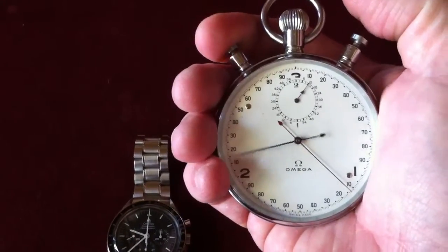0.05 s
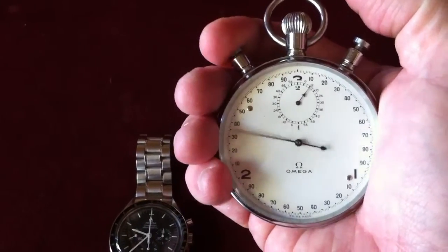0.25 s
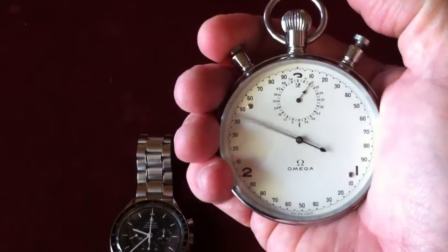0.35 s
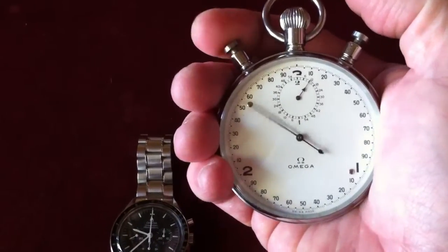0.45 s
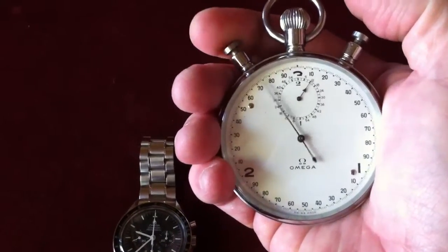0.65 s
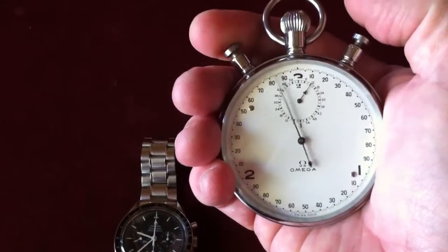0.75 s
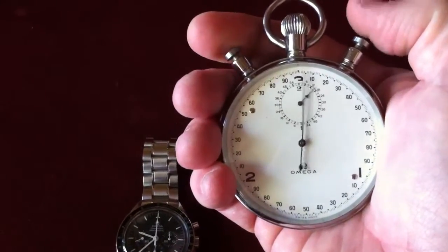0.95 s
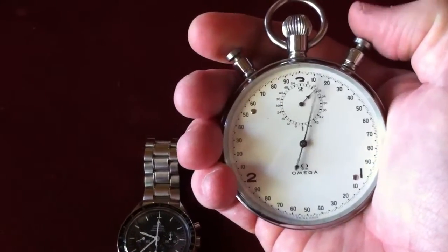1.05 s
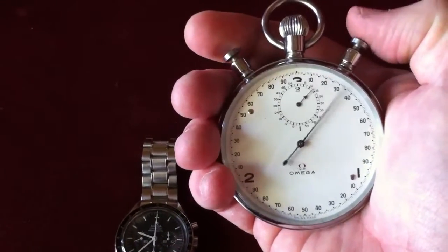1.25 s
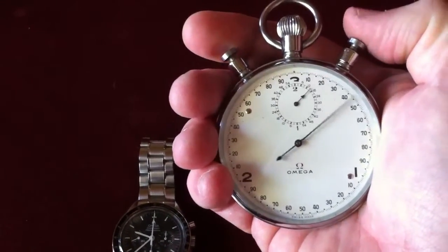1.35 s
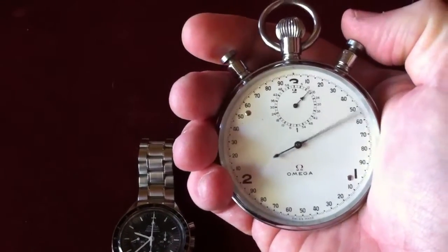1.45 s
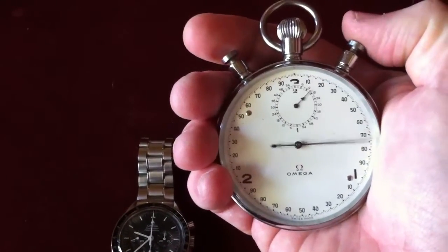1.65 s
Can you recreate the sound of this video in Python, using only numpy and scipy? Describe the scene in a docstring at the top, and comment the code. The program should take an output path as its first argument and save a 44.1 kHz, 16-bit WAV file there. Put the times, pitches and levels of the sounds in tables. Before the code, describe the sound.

A stopwatch button snaps once, sharp and metallic, near the start, after a tiny gap of silence. A very faint, rapid ticking whir runs throughout over low room hiss, heard close up in a quiet room.

```python
"""A stopwatch in the hand

A mechanical stopwatch runs close by in a quiet room. Its escapement whirs at about a hundred
beats a second: noise impulses excite damped modes of the steel case. All sound cuts out for
an instant, then the pusher snaps once: two filtered impulses, a brief ring and a rattle.
A diffuse room tail, shaped noise and a faint sine whine complete the sound field."""
import sys
import numpy as np
from scipy import signal
from scipy.fft import rfft, irfft
from scipy.io import wavfile
from scipy.ndimage import uniform_filter1d

SR = 44100
rng = np.random.default_rng(int(sys.argv[2]) if len(sys.argv) > 2 else 0)


def generate_wav(signal):
    """Clip the signal to [-1, 1] and save it as 16-bit WAV at the path in sys.argv[1]."""
    frames = np.transpose(np.atleast_2d(signal))
    scaled = np.clip(frames, -1, 1) * 32767
    pcm = np.round(scaled).astype(np.int16)
    wavfile.write(sys.argv[1], SR, pcm)


N = 74970  # length in samples


def amp(db):
    """Logarithmic level: converts decibels to an amplitude factor."""
    return 10 ** (np.asarray(db) / 20)


def unit(x):
    """Normalization: scales a signal to rms 1."""
    return x / np.sqrt(np.mean(x ** 2) + 1e-20)


def read(points, hz):
    """Interpolation: reads a table on a logarithmic frequency axis."""
    f, value = np.transpose(points)
    return np.interp(np.log(hz + 1), np.log(f + 1), value)


def add(mix, s, sound):
    """Superposition: adds a sound to the mix in place, from time s or from 0 if s is negative."""
    part = mix[max(round(s * SR), 0):][:len(sound)]
    part += sound[:len(part)]


def colour(x, points, size=4096):
    """Minimum-phase filtering: a causal response to the given spectrum keeps attacks sharp."""
    hz = abs(np.fft.fftfreq(size, 1 / SR))
    log_gain = np.log(amp(read(points, hz)))
    # the Hilbert transform of the log gain supplies the minimum phase
    response = np.exp(np.conj(signal.hilbert(log_gain)))
    taps = np.fft.ifft(response).real
    return signal.fftconvolve(x, taps[:size // 2])[:N]


GRAIN_DB = 4.5  # random level spread from sample to sample


def burst(t60, size=2048):
    """Exponential decay: a dying puff of uneven micro-impacts, normalized to energy 1."""
    push, grain = rng.standard_normal((2, size))
    decay_db = -60 * np.arange(size) / SR / t60
    x = push * amp(GRAIN_DB * grain + decay_db)
    return x / np.linalg.norm(x)


def ring(hz, db, t60):
    """Modal superposition: one blow starts a sum of exponentially damped sines."""
    t = np.arange(SR // 4)[:, None] / SR
    modes = amp(db - 60 * t / t60) * np.sin(2 * np.pi * hz * t)
    return modes.sum(axis=1)


# blows of the pusher's lever (t/s, relative level/dB)
LEVER_BLOWS = [(0.24888, 0), (0.24922, -12)]
# spectrum of the snap (f/Hz, gain/dB)
SNAP_SPECTRUM = [(100, -33.5), (400, -5.5), (720, 3), (1100, 3.5), (1500, -5), (2400, -28.5), (3100, 1),
                 (4500, -8.5), (5200, -11), (6400, 0.5), (7400, 8.5), (8500, -4), (9100, -21), (9900, 3),
                 (11000, -14), (12000, -12), (12600, -5), (13600, 3), (15500, -16)]
# modes of the steel case, also excited by the escapement
# (f/Hz, relative level under pusher/dB, t60/s, relative level under escapement/dB)
CASE_MODES = [(1279, -51, 0.057, -92), (1637, -21.5, 0.0097, -121), (1747, -49, 0.067, -69.5),
              (1978, -43, 0.048, -75), (2610, -57, 0.027, -84), (3240, -39, 0.0063, -100),
              (3288, -42, 0.022, -63.5), (5730, -33, 0.022, -76.5), (6230, -34.5, 0.035, -77),
              (6650, -40, 0.022, -88), (7350, -64, 0.022, -78.5), (7966, -41.5, 0.06, -78),
              (8420, -49, 0.043, -69), (10920, -43, 0.045, -78.5), (11250, -30.5, 0.012, -64),
              (13730, -34.5, .026, -85)]
# spectrum of the loose works (f/Hz, gain/dB)
RATTLE_SPECTRUM = [(300, -3.5), (700, -19), (1300, 1.5), (2300, -4.5), (3100, 7), (5000, -2.5), (7000, 4.5),
                   (9300, -6.5), (11000, 6.5), (12200, -19), (13800, 2), (15500, -14)]
# soft nudge of the case in the hand (t/s, level before filtering/dB, t60/s, low-pass corner f/Hz)
SOFT_NUDGE = (0.51, -33.5, .06, 3000)
SNAP_DB, RING_DB = 0.5, 0.5  # offsets to the table levels
RING_LAG_S = 0.00059
RATTLE_DB, RATTLE_T60_S = -9, 0.019  # level before filtering
BASS_CUT_HZ = 330


def pusher():
    """Impulsive excitation: lever blows ring the case and rattle the works; a soft nudge follows."""
    force, case, rattle = np.zeros((3, N))
    for s, db in LEVER_BLOWS:
        add(force, s, amp([SNAP_DB + db]))  # a single-sample impulse
    start = LEVER_BLOWS[0][0]
    mode_hz, mode_db, mode_t60, _ = np.transpose(CASE_MODES)
    add(case, start + RING_LAG_S, ring(mode_hz, mode_db + RING_DB, mode_t60))
    add(rattle, start, amp(RATTLE_DB) * burst(RATTLE_T60_S))

    s, db, t60, top_hz = SOFT_NUDGE
    low_pass = signal.butter(1, top_hz, fs=SR)
    add(rattle, s, signal.lfilter(*low_pass, amp(db) * burst(t60)))

    click = colour(force, SNAP_SPECTRUM) + case + colour(rattle, RATTLE_SPECTRUM)
    high_pass = signal.butter(2, BASS_CUT_HZ, "high", fs=SR)
    return signal.lfilter(*high_pass, click)


# contacts in one beat: unlocking, impulse, drop, two bounces (t after beat/s, relative level/dB)
BEAT_CONTACTS = [(-.0017, -5), (.0002, 4), (.0012, -2.5), (.003, -12), (.0044, -6.5)]
# spectrum of the ticking (f/Hz, relative gain/dB)
TICK_SPECTRUM = [(500, -68), (1500, -21.5), (2450, -6.5), (2850, -13), (4000, -7.5), (4700, -17),
                 (6700, -10), (7400, -2.5), (8600, -3.5), (9500, -5), (10100, -4.5), (10700, -8.5),
                 (12400, -11), (13300, 2.5), (13900, -1.5), (14400, 1.5), (15500, -8)]
# stray sharper ticks from the works or the pusher (t/s, level before filtering/dB, high-mode ring offset/dB)
SHARP_TICKS = [(0.2738, -37, 16), (0.305, -38, 14), (0.405, -36, 8.5), (0.4738, -41, 4), (0.514, -27, 6),
               (0.7745, -29.5, -2), (1.075, -44, 3), (1.136, -33, -4), (1.5475, -34, -12)]
# the hand's grip on the low modes
# (t/s, ring level offset/dB, tock level relative to tick/dB, mean tuning ratio)
HAND_GRIP = [(0, 1.5, -10, .992), (.17, 2, -10, .992), (.21, 4, -10, .98), (.29, 4.5, -8, .972),
             (.35, 4.5, -8, .978), (.43, 4.5, -8, .99), (.47, -3, -3, 1), (.51, 1, -6, .99),
             (.57, -2, -3, 1), (.69, 1, -5, 1), (.91, -1.5, -2, 1), (1.03, 1.5, -2, 1), (1.08, -2.5, -2, 1),
             (1.23, -2.5, -2, 1), (1.41, 1, -7, .995), (1.48, -3.5, -2, 1), (1.69, 2, -8, .995)]
SWING_HZ, FIRST_TICK_S, TOCK_AFTER_S = 49.927, 0.0045, 0.0091
TICK_DB, TOCK_DB = -64.5, -1  # rms of the regular contact noise; tock relative to tick
BEAT_SPREAD_DB, CONTACT_SPREAD_DB, CASE_SPREAD_DB = 0.4, 1.5, 3  # standard deviations
BEAT_JITTER_S, CASE_JITTER_S = 0.00012, 0.00027  # standard deviations
CONTACT_T60_S = 0.012
CASE_LAG_S, CASE_BUZZ_DB = 0.0016, 0.5  # ring delay and mean level offset
GRIP_TOP_HZ, GRIP_WOBBLE = 4000, 0.007  # upper limit of gripped modes; relative tuning deviation


def escapement():
    """Periodic excitation: ticks and tocks ring the case; the grip bends and swells low modes."""
    force, stray, buzz = np.zeros((3, N))
    hz, _, t60, mode_db = np.transpose(CASE_MODES)
    low = hz < GRIP_TOP_HZ
    chime = ring(hz[~low], mode_db[~low], t60[~low])
    times, *grip = np.transpose(HAND_GRIP)

    for swing in np.arange(FIRST_TICK_S, N / SR, 1 / SWING_HZ):
        grip_db, low_tock_db, tuning = (np.interp(swing, times, column) for column in grip)
        tuning = tuning * (1 + GRIP_WOBBLE * rng.standard_normal())
        hum = ring(hz[low] * tuning, mode_db[low] + grip_db, t60[low])
        tick = (0, 0, 0)
        tock = (TOCK_AFTER_S, TOCK_DB, low_tock_db)
        for offset, side_db, low_db in (tick, tock):
            s = swing + offset + BEAT_JITTER_S * rng.standard_normal()
            beat_db = side_db + BEAT_SPREAD_DB * rng.standard_normal()
            for after, db in BEAT_CONTACTS:
                contact_db = db + beat_db + CONTACT_SPREAD_DB * rng.standard_normal()
                add(force, s + after, amp(contact_db) * burst(CONTACT_T60_S))
            gain = amp(CASE_BUZZ_DB + CASE_SPREAD_DB * rng.standard_normal())
            ring_time = s + CASE_LAG_S + CASE_JITTER_S * rng.standard_normal()
            case_ring = amp(low_db) * hum + amp(side_db) * chime
            add(buzz, ring_time, gain * case_ring)

    for s, db, chime_db in SHARP_TICKS:
        add(stray, s, amp(db) * burst(CONTACT_T60_S))
        add(buzz, s, amp(chime_db) * chime)
    ticking = amp(TICK_DB) * unit(colour(force, TICK_SPECTRUM))
    return ticking + colour(stray, TICK_SPECTRUM) + buzz


# diffuse tail of the room (f/Hz, t60/s, relative level/dB)
ROOM_DECAY = [(300, 0.35, 3), (1040, 0.23, 8), (1790, 0.44, 7.5), (5130, 0.32, 12.5), (6500, 0.22, 4),
              (9000, 0.4, 5.5), (14800, 0.1, 9)]
ROOM_DB, ROOM_DELAY_S = -25, 0.011  # gain of the energy-normalized tail; its delay


def room(x, size=256):
    """Diffuse reverberation: convolution with noise whose decay rate depends on frequency."""
    hz, t, z = signal.stft(rng.standard_normal(SR // 2), SR, nperseg=size)
    table = np.array(ROOM_DECAY)
    t60, db = (read(table[:, [0, k]], hz)[:, None] for k in (1, 2))
    tail = signal.istft(z * amp(db - 60 * t / t60), SR, nperseg=size)[1]
    tail = tail * (np.arange(len(tail)) / SR > ROOM_DELAY_S)
    return signal.fftconvolve(x, tail / np.linalg.norm(tail))[:N]


# spectrum of room rumble and hiss (f/Hz, relative spectral density level per Hz/dB)
AIR_SPECTRUM = [(20, -19.5), (50, -16.5), (80, -5), (108, 2.5), (150, -3.5), (310, -1.5), (420, -7.5),
                (900, -17), (1400, -19), (2200, -14), (2850, -21.5), (4600, -19.5), (8000, -20.5),
                (12200, -24), (13600, -17.5), (15500, -24.5)]
AIR_DB = -65.5  # rms of the noise
WHINE_HZ, WHINE_DB = 15000, -83  # rms level


def air():
    """Stationary noise: spectrally shaped rumble and hiss with a faint electrical whine."""
    gain = amp(read(AIR_SPECTRUM, np.fft.rfftfreq(N, 1 / SR)))
    hiss = irfft(rfft(rng.standard_normal(N)) * gain, N)
    whine = np.sin(2 * np.pi * WHINE_HZ * np.arange(N) / SR)
    return amp(AIR_DB) * unit(hiss) + amp(WHINE_DB) * unit(whine)


def scene():
    """Linear superposition: the watch, its faint reverberation and the room's own noise."""
    watch = pusher() + escapement()
    return (watch + amp(ROOM_DB) * room(watch) + air())[None]


# dropout just before the snap (start t/s, end t/s)
DROPOUT = (.2332, .2455)
EDGE_HZ = 15750  # upper band limit


def record(dry):
    """Gating and band limitation: all sound drops out briefly; a low-pass then trims the treble."""
    t = np.arange(N) / SR
    audible = (t < DROPOUT[0]) | (t > DROPOUT[1])
    gate = uniform_filter1d(1. * audible, size=32)  # softens the edges
    low_pass = signal.firwin(255, EDGE_HZ, window=("kaiser", 8), fs=SR)
    return signal.oaconvolve(dry * gate, low_pass[None], "same")


dry = scene()
out = record(dry)
generate_wav(out)
```